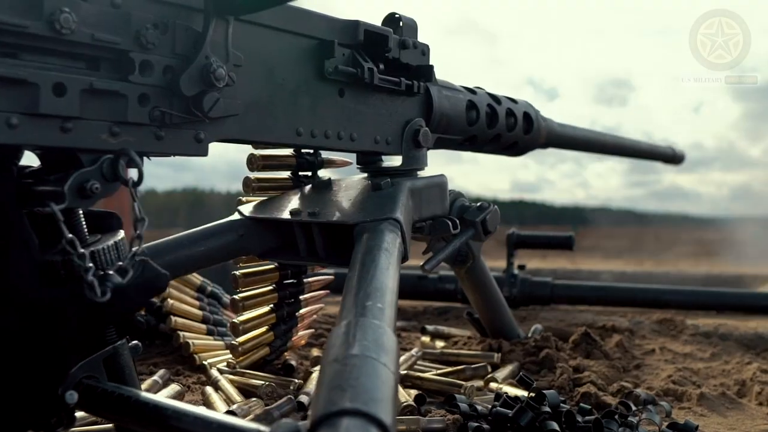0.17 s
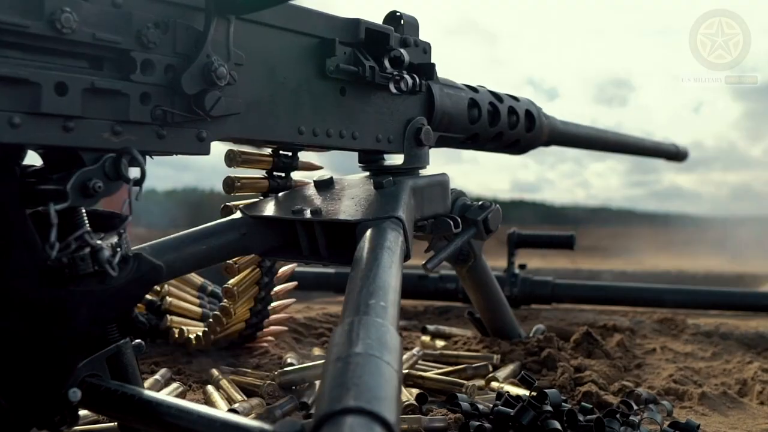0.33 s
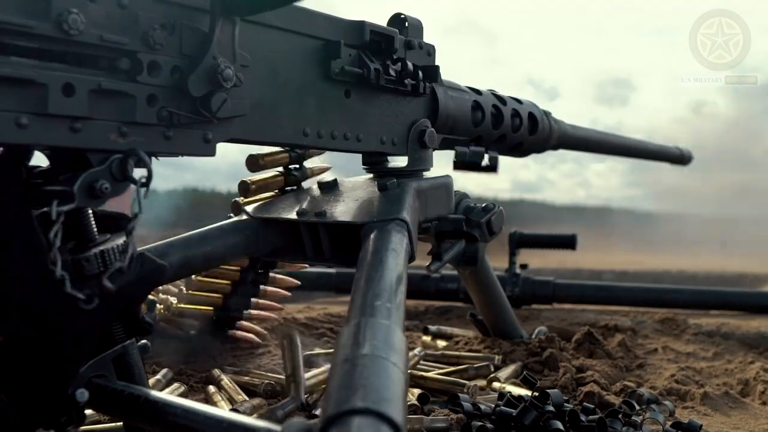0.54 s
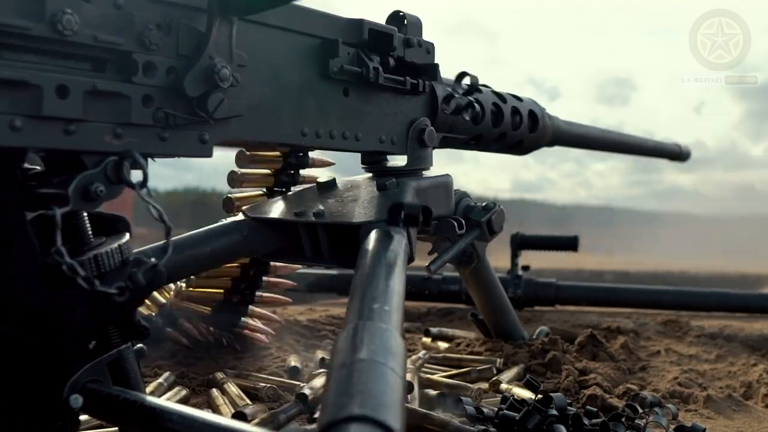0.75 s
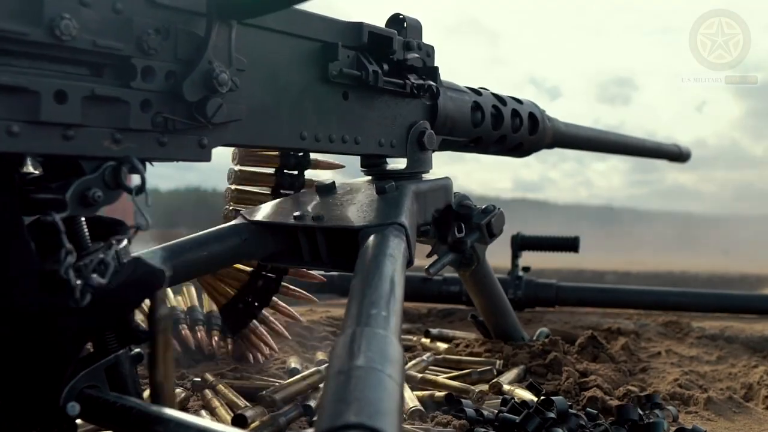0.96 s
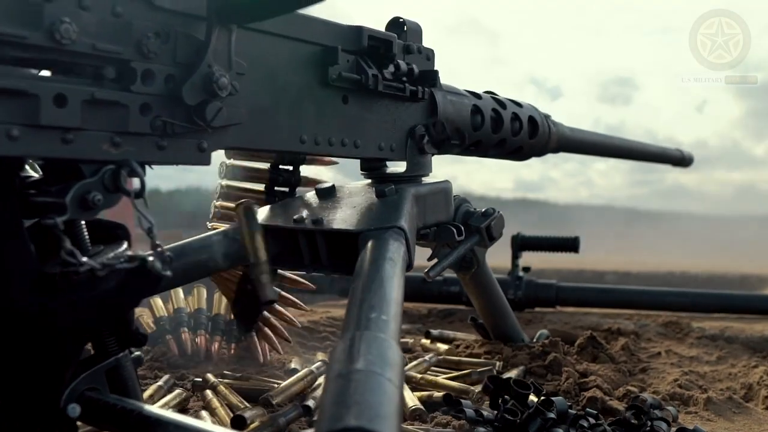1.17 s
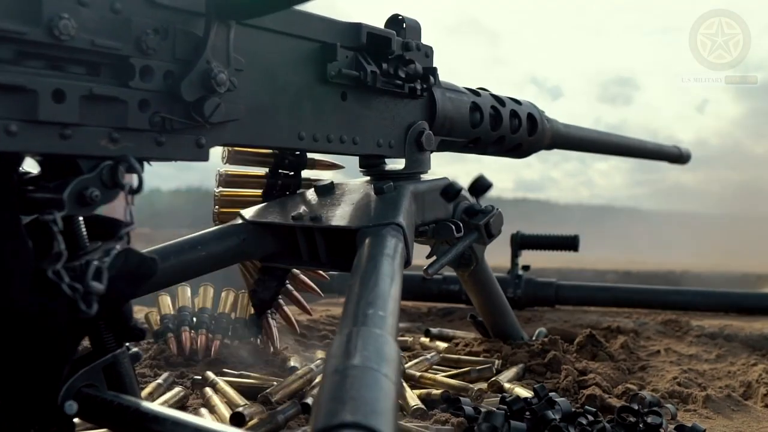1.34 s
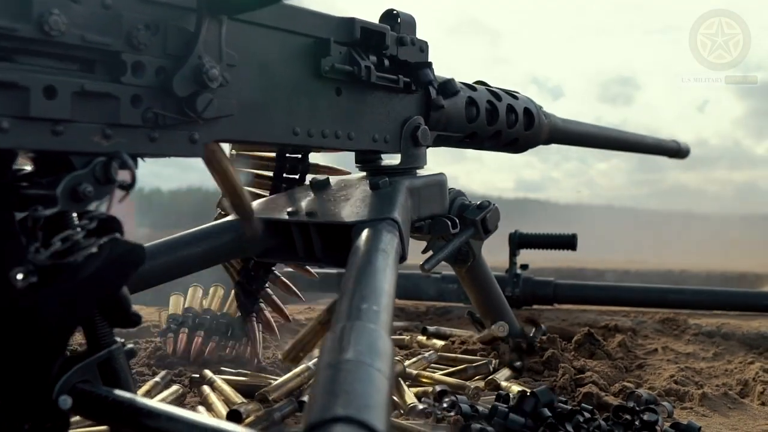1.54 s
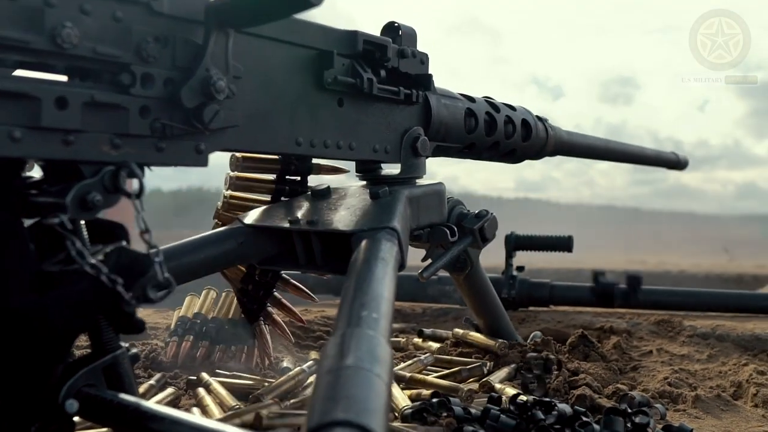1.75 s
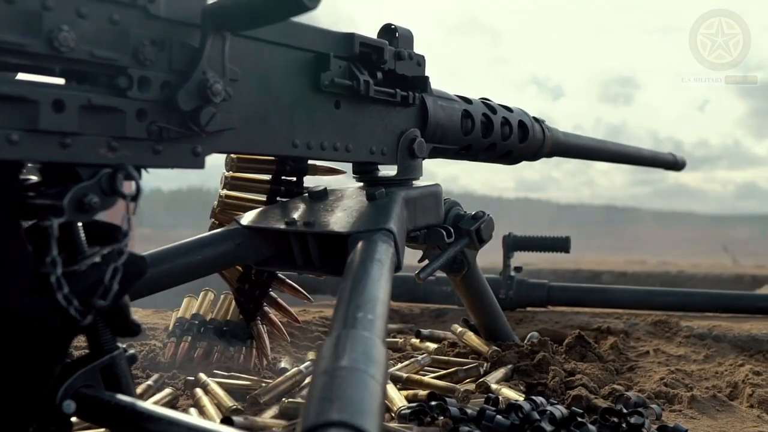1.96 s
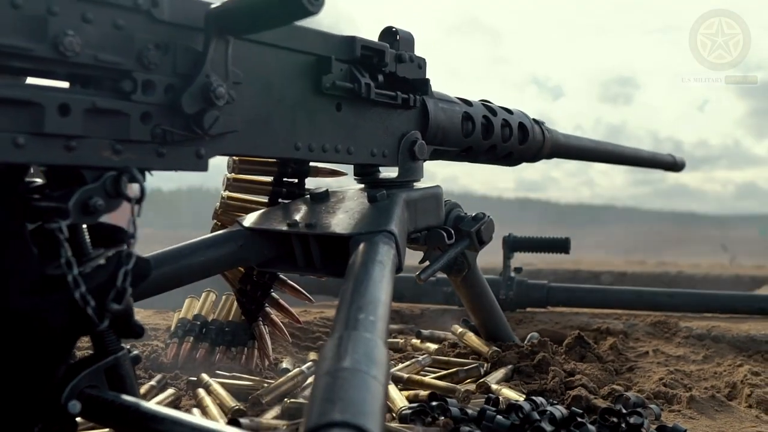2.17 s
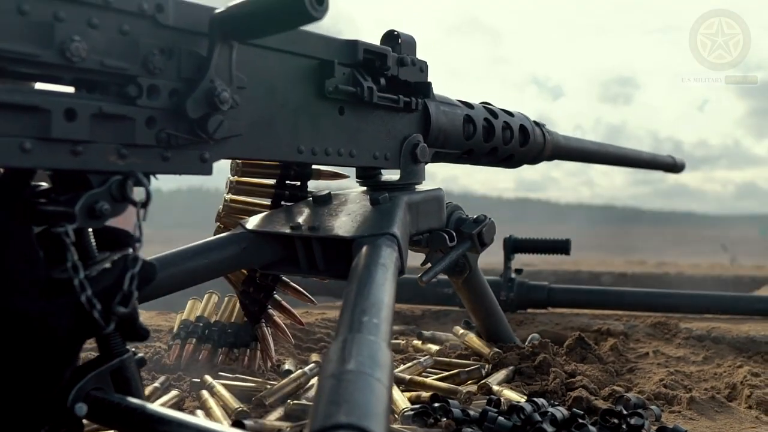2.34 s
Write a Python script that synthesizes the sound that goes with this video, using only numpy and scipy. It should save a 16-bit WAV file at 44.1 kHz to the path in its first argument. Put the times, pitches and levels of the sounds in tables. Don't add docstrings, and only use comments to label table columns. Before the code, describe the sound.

Heavy machine gun very close on an open field: faint distant thumps, then a steady burst of overloaded blasts with clanging bolt and rattling belt, ending abruptly as brass cases ring and settle on the heap.

```python
import sys
import numpy as np
from scipy import signal
from scipy.fft import rfft, irfft
from scipy.io import wavfile
from scipy.ndimage import uniform_filter1d

SR = 44100
rng = np.random.default_rng(int(sys.argv[2]) if len(sys.argv) > 2 else 0)


def transcribe(u):
    v = np.clip(np.atleast_2d(u).T, -1, 1)
    q = np.round(v * 32767).astype(np.int16)
    wavfile.write(sys.argv[1], SR, q)


def to_linear_factor(level_db):
    exponent = np.asarray(level_db, float) / 20
    return 10 ** exponent


N = 105840

# (frequency [Hz], density [dB])
WASH_SPECTRUM = [(30, -11), (130, -4), (550, -12.5), (1100, -2), (2100, -2), (3300, -13.5), (6500, -17),
                 (9000, -31), (15500, -42)]
# (time [s], level [dB])
WASH_LEVEL = [(0, -37.5), (.06, -49), (.2, -45.5), (1.7, -47.5), (1.9, -47.5), (2.1, -51), (2.4, -53.5)]
# (frequency [Hz], likeness [0-1])
LIKENESS = [(60, 0.93), (180, 1), (550, 0.6), (1650, 0.15), (4970, 0.16), (15000, 0.0)]
# (time [s], peak level [dB], crack level [dB], pitch [factor])
FAR_SHOTS = [
    (.002, -34.5, -17, 1.4),
    (.014, -30.5, -15, 1.14),
    (0.057, -43.5, 13.5, 0.67),
    (0.119, -33, 2.5, 0.87),
    (.155, -41, 9, 0.64),
    (0.215, -30, 5.5, 0.82),
    (1.8234, -26, 14.5, 1.72),
    (1.9179, -44, 6, 2.6),
]
FAR_HZ, FAR_T60_S, FAR_ECHO_S, FAR_ECHO_DB = 167, 0.032, 0.0026, -8
# (time [s], peak level [dB], length [s])
BUMPS = [
    (.009, -39, 0.0054),
    (0.017, -30.5, .0045),
]
# (time [s], peak level [dB], pitch [Hz])
TICKS = [
    (1.9187, -31.5, 2100),
    (2.010, -40, 5460),
    (2.074, -30, 6600),
    (2.096, -39.5, 6000),
    (2.2175, -47, 5300),
    (2.2, -43, 2800),
    (1.8236, -22, 5100),
    (0.1, -36, 930),
    (2.3165, -54, 5600),
]

# (time [s], peak level [dB])
SLAMS = [(0.2295, -9), (0.3586, -9), (0.485, -10.5), (0.615, -13), (0.749, -11), (0.8833, -11),
         (1.0126, -12.5), (1.1421, -10.5), (1.27, -10), (1.395, -12), (1.5426, -13), (1.6739, -16)]
RELEASES = [0.2641, .394, 0.521, .651, 0.7848, .919, 1.049, 1.180, 1.3081, 1.432, 1.579]
# (time [s], peak level [dB], pitch [Hz])
KNOCKS = [(0.326, -10, 5100), (0.446, -10.5, 2760), (0.474, -8.5, 4140), (0.575, -10.5, 5720),
          (0.599, -10.5, 4140), (0.704, -13, 2810), (0.729, -10.5, 1950), (0.837, -12, 2750),
          (0.851, -15, 3300), (0.863, -15, 3290), (0.965, -11, 1790), (0.979, -14.5, 3030),
          (0.994, -9, 4100), (1.104, -27, 3700), (1.11, -23, 3240), (1.127, -16, 4130), (1.239, -15, 2060),
          (1.347, -28, 2810), (1.504, -30, 2900), (1.524, -13, 4300), (1.63, -22, 1730), (1.641, -18, 3160)]
# (share of round [0-1], level [dB])
EFFORT = [(0, 0.5), (.08, 3.5), (.2, -1), (.3, -4.5), (.42, -4.5), (.56, -8.5), (.68, -4), (.8, -0.5),
          (1, -3)]
# (frequency [Hz], density [dB])
STEEL_SPECTRUM = [(400, -22), (800, -13), (1300, -4), (3000, -2), (5500, -2.5), (8000, -7), (15500, -11)]
# (frequency [Hz], level [dB], t60 [s])
STEEL_MODES = [(1018, -1, 0.031), (1340, 1.5, 0.069), (1710, -1.5, 0.016), (2080, -3, 0.013),
               (2760, -13, 0.052), (3610, -8, 0.038), (4140, 4, 0.04), (5610, -1.5, 0.013)]
BODY_DB, FIZZ_DB, FIZZ_FOLLOW, SPLIT_HZ = -23, -25.5, 1.7, 8000
GRAINS_PER_S, GRAIN_DB, RINGS_DB = 3500, 3, -10.5
STOP_T60_S, SLAM_T60_S, SLAM_DB = 0.13, 0.033, -10.5
KNOCK_T60_S, KNOCK_DB, CRACK_T60_S, CRACK_DB = 0.04, -8.5, 0.051, -33
DUCK_S, DUCK_DB, DUCK_LOW_S, DUCK_LOW_DB, DUCK_EDGE_S = 0.0087, -11, 0.0042, -15, 0.0057
# (frequency [Hz], level [dB], delay [s], t60 [s])
CLANG_MODES = [(1660, -7.5, 0., .025), (2900, -8.5, 0., 0.0093), (1128, -13, .012, 0.038),
               (1330, -14.5, .018, 0.021), (1379, -13.5, .037, .04), (806, -15.5, 0.01, 0.021)]
CLANG_SPREAD = 0.085

BLAST_LEAD_S, BLAST_TOP_HZ, BLAST_END_HZ, BLAST_FALL_S = 0.022, 1535, 320, 0.029
BLAST_DB, BLAST_T60_S, LUMPS_PER_S = -19, 0.19, 900
# (frequency [Hz], level [dB], start after release [s], length [s])
BOOMS = [(349, -32.5, -.012, 0.047), (239.3, -38, -.004, 0.068), (137.3, -41, 0.01, 0.064),
         (124, -42.5, -0.019, 0.033), (521, -34, -0.021, 0.039), (710, -32.5, -.018, 0.024),
         (697, -41, .047, 0.011)]
ROLL_HZ, ROLL_WIDTH_HZ, ROLL_DB, ROLL_RISE_S, ROLL_HOLD_S = 303, 300, -42, 0.0094, 0.067
ROLL_FAR_DB, ROLL_FAR_T60_S = -8.5, 0.9

# (time [s], peak level [dB])
LINKS = [(0.2944, -29), (0.422, -28.5), (0.4742, -21), (0.5506, -21), (0.683, -21), (0.7244, -24.5),
         (0.8546, -24.5), (0.9604, -24), (1.0835, -29), (1.2127, -22.5), (1.3437, -22.5), (1.4965, -22.5),
         (1.6004, -38), (1.6336, -30)]
LINK_HZ, LINK_T60_S, LINK_DB, LINK_HOLD_S = 6235, 0.24, -1.5, 0.03
# (frequency [Hz], level [dB], t60 [s])
CASE_MODES = [(6465, -14, .2), (8630, -12, .15), (10010, -2, .22), (11070, -5, .55), (11760, -1, .14),
              (12540, -4, .35), (12840, -6, .2), (13420, -6, .15), (14160, -8, .22), (14850, -3, .15),
              (11290, -12, .2)]
HEAP_PER_S, HEAP_DB, HEAP_END_S = 40, -33, 1.7
# (time [s], frequency [Hz], peak level [dB], t60 [s])
LAST_RINGS = [
    (1.69, 6240, -34, 0.9),
    (1.715, 4660, -41, 0.9),
    (1.66, 5100, -37, 0.23),
    (1.94, 12239, -42, 1.4),
    (1.69, 4150, -36, .1),
    (1.83, 5900, -48, .4),
    (1.91, 6500, -50, .4),
              (1.685, 9500, -35, 0.13), (1.69, 11730, -47, .1), (1.69, 14870, -40, .4), (1.711, 8620, -43, .4),
          (1.715, 11200, -44, 0.45), (1.715, 13410, -38, .2), (1.72, 11624, -44, .3),
          (1.751, 11624, -39, 0.16), (1.72, 12700, -49, 0.53), (1.75, 14730, -46, .2),
          (1.75, 10011, -47, 0.26), (1.75, 14090, -53, 0.44), (1.788, 8360, -41, 0.49),
          (1.79, 14865, -39, .3), (1.804, 10060, -35, 0.21), (1.81, 13263, -43, .15),
          (1.809, 11800, -45, 0.34), (1.838, 12800, -37, .25), (1.838, 12700, -46, .5),
          (1.868, 14136, -40, .2), (1.868, 14950, -43, .2), (1.87, 9970, -44, 0.5),
          (1.922, 12900, -37, 0.27), (1.922, 14868, -36, .15), (1.932, 11750, -31, 0.13),
          (1.93, 9960, -42, .35), (1.93, 11050, -46, 0.45), (1.94, 13827, -46, .15),
          (1.945, 10000, -38.5, 0.17), (1.95, 12535, -42, .3), (1.955, 11078, -41, .25),
          (1.955, 8500, -47, 0.24), (1.975, 10824, -51, 0.62), (1.98, 11658, -52, 0.23)]
# (time [s], level [dB])
SETTLE_LEVEL = [
    (1.66, -40),
    (1.71, -44),
    (1.78, -47),
    (1.795, -39),
    (1.9, -49),
    (1.925, -41),
    (1.97, -52),
    (2.1, -72),
]
RING_CAUGHT_S, RING_CAUGHT_DB = 1.825, -8
LOW_CUT_HZ, EDGE_HZ, CEILING = 137, 15080, 0.78


def evened(x):
    return x / np.sqrt(np.mean(x ** 2) + 1e-20)


def read(points, hz):
    f, value = np.transpose(points)
    return np.interp(np.log(hz + 1), np.log(f + 1), value)


def add(mix, s, sound, pan_db=0):
    part = mix[:, max(round(s * SR), 0):][:, :np.shape(sound)[-1]]
    sides = to_linear_factor(np.array([[pan_db / 2], [-pan_db / 2]]))
    part += (np.atleast_2d(sound) * sides)[:, :part.shape[1]]


def resonate(x, hz, width_hz):
    turn = np.exp(2j * np.pi * np.cumsum(hz * np.ones(x.shape[-1])) / SR)
    r = np.exp(-np.pi * width_hz / SR)
    return 2 * (turn * signal.lfilter([1 - r], [1, -r], x / turn)).real


def pair(x, gain):
    hz, z = np.fft.rfftfreq(x.shape[1], 1 / SR), rfft(x)
    same = np.clip(read(LIKENESS, hz) * 1.066, -1, 1)
    right = same * z[0] + np.sqrt(1 - same ** 2) * z[1]
    return irfft(gain(hz) * np.array([z[0], right]), x.shape[1])


def dying(t60_s, length_s):
    return to_linear_factor(-60 * np.arange(round(length_s * SR)) / SR / t60_s)


def lumpy(shape, width):
    return evened(uniform_filter1d(rng.standard_normal(shape), width))


def limiter(depth_db, hold_s):
    t, duck = np.arange(N) / SR, np.zeros(N)
    for s in RELEASES:
        sink = np.clip((t - s + hold_s + DUCK_EDGE_S) / DUCK_EDGE_S, 0, 1)
        duck += sink * np.clip((s - t) / 0.00038, 0, 1)
    return to_linear_factor(depth_db * duck)


def wash():
    level_db = np.interp(np.arange(N) / SR, *np.transpose(WASH_LEVEL)) + 2.0 * lumpy(N, 500)
    noise = pair(rng.standard_normal((2, N)), lambda hz: to_linear_factor(read(WASH_SPECTRUM, hz)))
    return evened(noise) * to_linear_factor(level_db)


def far_guns():
    out, t = np.zeros((2, N)), np.arange(4000) / SR
    u = t / 0.00013
    for s, db, crack_db, pitch in FAR_SHOTS:
        hiss = 0.063 * rng.standard_normal(len(t)) * to_linear_factor(-60 * t / 0.17)
        crack = resonate((1 - u) * np.exp(-u) + hiss, 1340, 6400)
        fall = 1 + 0.91 * np.exp(-t / 0.0042)
        shot = np.sin(2 * np.pi * FAR_HZ * pitch * t * fall) * to_linear_factor(-60 * t * pitch / FAR_T60_S)
        shot += to_linear_factor(crack_db) * crack
        shot += 0.74 * np.sin(2 * np.pi * 400 * t) * to_linear_factor(-60 * t / 0.014)
        shot += 0.1 * np.sin(2 * np.pi * 145 * t) * to_linear_factor(-60 * t / 0.21)
        add(out, s, to_linear_factor(db) * shot, -2 * s)
        add(out, s + FAR_ECHO_S, to_linear_factor(db + crack_db + FAR_ECHO_DB) * crack, -2 * s)
    return out


def bumps():
    out = np.zeros((2, N))
    for s, db, length_s in BUMPS:
        u = np.arange(2600) / SR / length_s
        add(out, s, to_linear_factor(db) * np.e * u * 3 * np.exp(-u * 3))
    return out


def ticks():
    out = np.zeros((2, N))
    for s, db, hz in TICKS:
        noise = resonate(resonate(rng.standard_normal(900), hz, 1400), hz, 2500)
        add(out, s, to_linear_factor(db - 3.5) * evened(noise) * dying(0.015, 1)[:900], -4)
    return out


def steel_layer(puff, level_db, follow, side, drive):
    def colour(hz):
        return to_linear_factor(read(STEEL_SPECTRUM, hz)) / np.sqrt(1 + (hz / SPLIT_HZ + 1e-4) ** (-12. * side))

    effort_db, running, hits = drive
    noise = rng.standard_normal((2, N)) * puff
    steel = evened(pair(noise, colour))
    if side < 0:
        rings = sum(to_linear_factor(db) * resonate(noise, hz, 3.0 / t60) for hz, db, t60 in STEEL_MODES)
        steel = evened(steel + to_linear_factor(RINGS_DB) * evened(rings))
    return steel * (to_linear_factor(level_db + follow * effort_db) * running + hits * to_linear_factor(1.6 * (level_db - BODY_DB)))


def knocks():
    out = np.zeros((2, N))
    for s, db, hz in KNOCKS:
        burst = rng.standard_normal((2, 1300)) * dying(KNOCK_T60_S, 1)[:1300]
        burst = resonate(burst[0] + 0.29 * burst, hz, 0.26 * hz) + 0.15 * burst
        add(out, s, to_linear_factor(db + KNOCK_DB) * burst / abs(burst).max() * 2)
    return out


def action():
    t, at = np.arange(N) / SR, np.transpose(SLAMS)[0]
    turn = np.interp(t, at, np.arange(len(at)))
    effort_db = np.interp(turn % 1, *np.transpose(EFFORT)) - 60 * np.maximum(t - at[-1], 0) / STOP_T60_S
    grains = to_linear_factor(GRAIN_DB * np.minimum(rng.exponential(1, N), 5)) * (rng.random(N) < GRAINS_PER_S / SR)
    puff = 0.84 + evened(signal.lfilter([1], [1, -.9], grains))
    hits = np.zeros((2, N))
    for s, db in SLAMS:
        add(hits, s, to_linear_factor(db + SLAM_DB) * dying(SLAM_T60_S, 0.033))
    for s in RELEASES:
        add(hits, s, to_linear_factor(CRACK_DB) * dying(CRACK_T60_S, 0.03))
    drive = effort_db, t > at[0], hits
    body = steel_layer(puff, BODY_DB, 1, -1, drive)
    fizz = steel_layer(puff, FIZZ_DB, FIZZ_FOLLOW, 1, drive)
    return (body + fizz + knocks()) * limiter(DUCK_DB, DUCK_S)


def clangs():
    out, t = np.zeros((2, N)), np.arange(2000) / SR
    for s, db in SLAMS:
        for hz, mode_db, delay_s, t60 in CLANG_MODES:
            detune, phase, late, uneven = rng.uniform(-1.02, 1, 4)
            wave = np.sin(2 * np.pi * hz * (1 + CLANG_SPREAD * detune) * t + np.array([[0], [1.4 * phase]]))
            env = to_linear_factor(db + mode_db + 5.2 * uneven - 60 * t / t60) * np.minimum(t / 0.00083, 1)
            add(out, s + delay_s * (1 + .2 * late), env * wave)
    return out * limiter(DUCK_DB, DUCK_S)


def blasts():
    out, t = np.zeros((2, N)), np.arange(4400) / SR
    echoes = rng.standard_normal(len(t)) * (rng.random(len(t)) < LUMPS_PER_S / SR)
    hz = BLAST_END_HZ + (BLAST_TOP_HZ - BLAST_END_HZ) * np.exp(-t / BLAST_FALL_S)
    booms = np.zeros((2, 2 * len(t)))
    for f, db, start_s, length_s in BOOMS:
        shape = np.sin(np.pi * np.clip(t / length_s, 0, 1) ** 0.56)
        wave = np.sin(2 * np.pi * f * t * (1.04 - t) + rng.uniform(0, 1, (2, 1)))
        add(booms, start_s + BLAST_LEAD_S, to_linear_factor(db) * shape * wave)
    for s in RELEASES:
        lumps = pair(echoes + 0.11 * rng.standard_normal((2, len(t))), np.ones_like)
        roll = evened(resonate(resonate(lumps, hz, 690), hz, 1120) / np.sqrt(hz))
        env = to_linear_factor(BLAST_DB - 60 * t / BLAST_T60_S) * np.minimum(t / 0.0022, 1)
        add(out, s - BLAST_LEAD_S, roll * env)
        add(out, s - BLAST_LEAD_S, booms * to_linear_factor(2.9 * lumpy(2 * len(t), 300)))
    return out * limiter(DUCK_LOW_DB, DUCK_LOW_S)


def rolls():
    t, env = np.arange(SR) / SR, np.zeros((2, N))
    near = np.clip((ROLL_HOLD_S - t) / 0.018, 0, 1)
    far = to_linear_factor(ROLL_FAR_DB - 60 * t / ROLL_FAR_T60_S)
    for s in RELEASES:
        add(env, s - .004, np.minimum(t / ROLL_RISE_S, 1) * (near + far * (s > 1.5)))
    noise = pair(rng.standard_normal((2, N)), np.ones_like)
    rumble = resonate(resonate(noise, ROLL_HZ, ROLL_WIDTH_HZ), ROLL_HZ, ROLL_WIDTH_HZ)
    return to_linear_factor(ROLL_DB) * env * evened(rumble)


def links():
    out, t = np.zeros((2, N)), np.arange(SR // 2) / SR
    for s, db in LINKS:
        hz = LINK_HZ * rng.uniform(.998, 1.003)
        phase = rng.uniform(0, 1.35)
        env = to_linear_factor(db + LINK_DB - 60 * t / LINK_T60_S) * np.minimum(t / 0.00066, 1)
        env = env * np.clip((LINK_HOLD_S - t) / 0.0029, 0, 1)
        env = env * (1 + 0.24 * lumpy((2, len(t)), 130))
        add(out, s, env * np.sin(2 * np.pi * hz * t + np.array([[0], [phase]])))
    return out * limiter(DUCK_DB, DUCK_S)


def clink(level_db):
    t, draw = np.arange(round(.06 * SR)) / SR, rng.random((len(CASE_MODES), 4))
    hz, db, t60 = np.transpose(CASE_MODES)[:, :, None]
    hz = hz * (1 + .14 * (draw[:, 2:3] - .5))
    size = to_linear_factor(level_db + db - 35 * draw[:, 3:] - 60 * t / (t60 * .6))
    return np.array([(size * np.sin(2 * np.pi * (hz * t + draw[:, k:k + 1]))).sum(0) for k in (0, 1)])


def heap():
    out = np.zeros((2, N))
    for s in np.arange(.3, HEAP_END_S, 1 / HEAP_PER_S):
        fade_db = -18 * max(s - 1.6, 0)
        add(out, s + .02 * rng.random(), clink(HEAP_DB + fade_db + 4 * rng.standard_normal()))
    return out * limiter(DUCK_DB, DUCK_S)


def settling():
    out, t = np.zeros((2, N)), np.arange(SR // 2) / SR
    for s, hz, db, t60 in LAST_RINGS:
        beat = 1 + .5 * lumpy((2, len(t)), 300)
        caught = to_linear_factor(RING_CAUGHT_DB * np.clip((s + t - RING_CAUGHT_S) / .01, 0, 1) * (s < 1.72))
        env = to_linear_factor(db - 60 * t / t60) * np.minimum(t / .002, 1) * np.minimum((t[-1] - t) / .05, 1)
        wave = np.sin(2 * np.pi * hz * t + np.array([[0], [1.1]]))
        add(out, s, env * beat * caught * wave, -4)

    def colour(hz):
        peaks = sum(1 / np.hypot(1, (hz - f) / 45) for f, _, _ in CASE_MODES)
        return np.clip(hz / 5000, 0, 1) ** 2 * (.22 + peaks)

    shimmer = evened(pair(rng.standard_normal((2, N)), colour))
    return out + shimmer * to_linear_factor(np.interp(np.arange(N) / SR, *np.transpose(SETTLE_LEVEL), left=-120))


def scene():
    field = wash() + far_guns() + ticks()
    gun = action() + clangs() + blasts() + rolls()
    return field + gun + links() + heap() + settling()


def top_cut(x):
    return signal.sosfilt(signal.butter(12, 16370, fs=SR, output="sos"), x)


def record(dry):
    low_cut = signal.butter(2, LOW_CUT_HZ, "high", fs=SR, output="sos")
    balance = to_linear_factor(np.array([[-.45], [.45]]))
    picked_up = balance * signal.sosfilt(low_cut, dry) + bumps()
    overloaded = CEILING * np.tanh(picked_up / CEILING)
    taps = signal.firwin(601, EDGE_HZ, window=("kaiser", 4), fs=SR)
    return top_cut(signal.oaconvolve(overloaded, taps[None], "same"))


dry = scene()
out = record(dry)
transcribe(out)
```